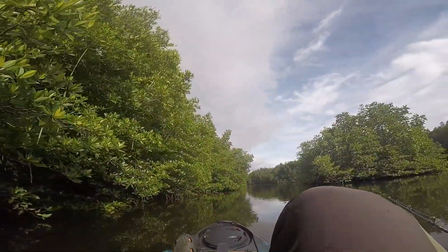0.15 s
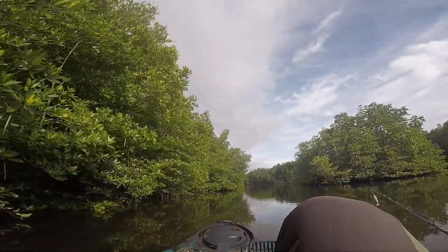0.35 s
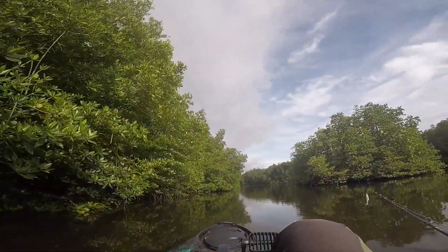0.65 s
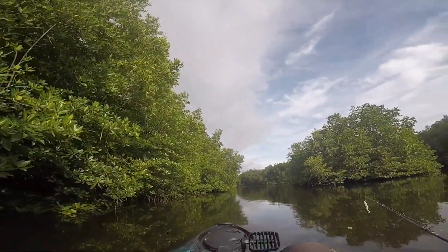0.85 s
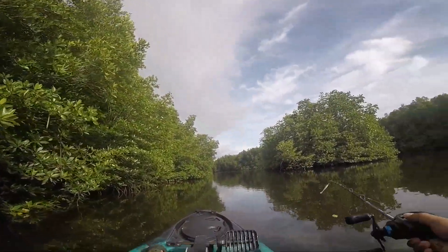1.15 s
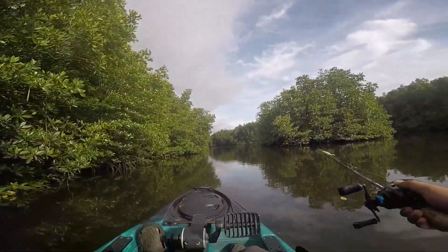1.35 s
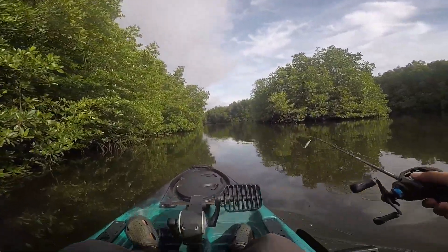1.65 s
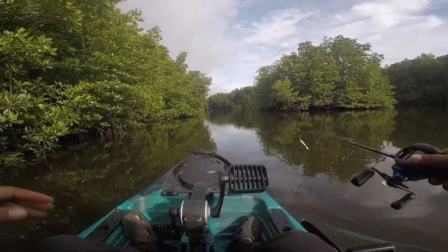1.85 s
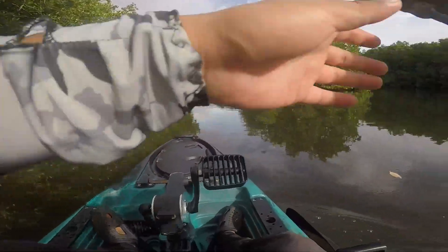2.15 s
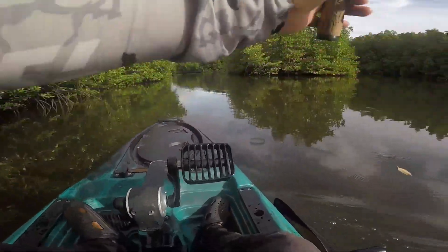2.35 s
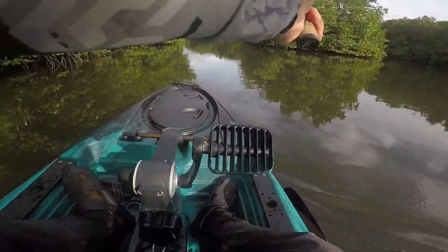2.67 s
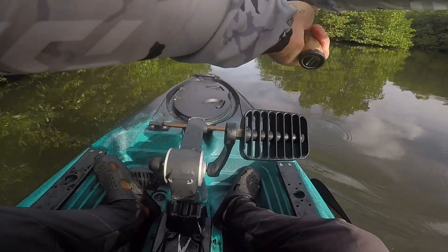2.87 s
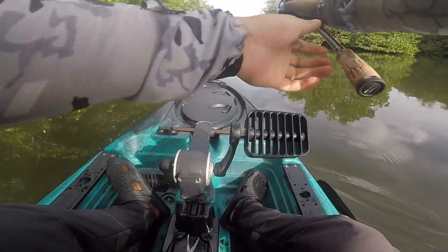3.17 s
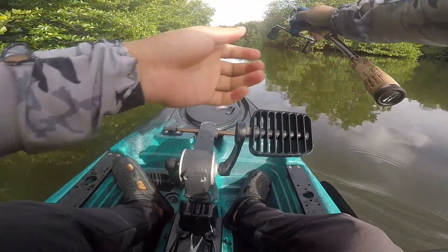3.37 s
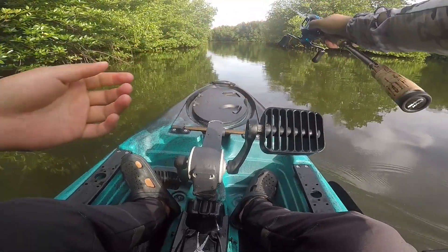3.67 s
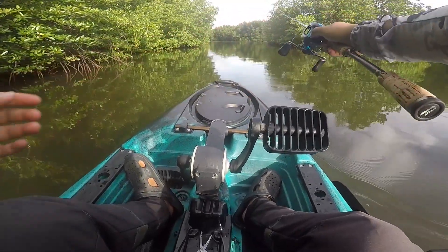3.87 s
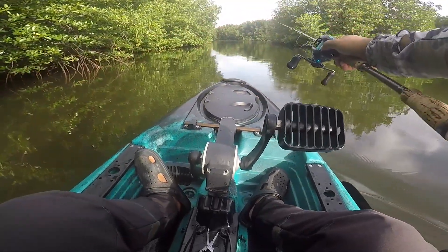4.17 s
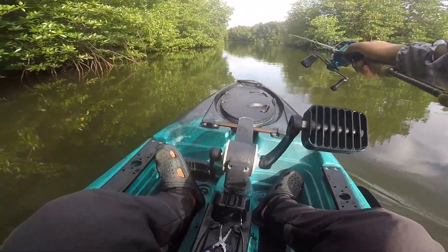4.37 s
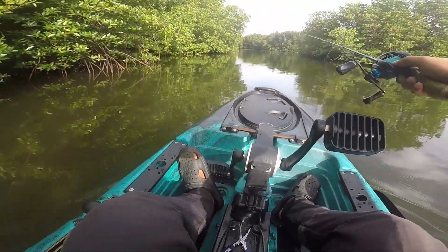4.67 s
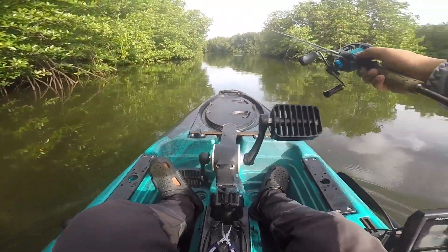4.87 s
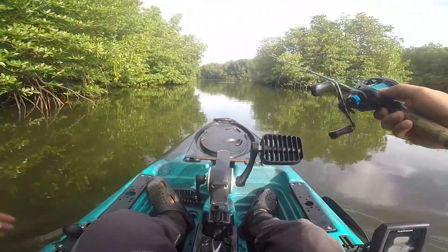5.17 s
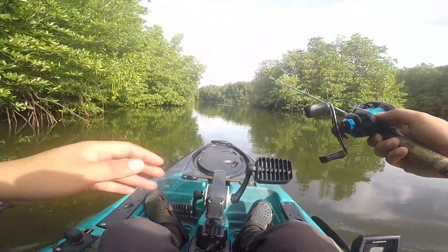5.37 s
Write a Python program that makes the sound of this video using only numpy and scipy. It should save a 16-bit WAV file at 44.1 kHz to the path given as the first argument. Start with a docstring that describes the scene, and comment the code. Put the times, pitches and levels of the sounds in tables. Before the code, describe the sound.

A cicada chirps in fast, shrill pulses over a distant insect chorus, with close sleeve rustles, soft knocks and a low rumble.

```python
"""Mangroves, from a drifting kayak. Off to the left a cicada buckles its tymbals and rings its abdomen,
five loud chirps a second, over distant cicadas and a faint hiss of air. The microphone is on an angler's
chest: with each arm movement a sleeve swishes and the shirt drags on its case, which is bumped, knocked
and ticks in its mount; the reel clicks once. About halfway through, the wind filter opens and lets in
the low rumble of boat and body."""
import sys
import numpy as np
from scipy import signal
from scipy.fft import rfft, irfft, next_fast_len
from scipy.io import wavfile
from scipy.ndimage import minimum_filter1d

SR = 44100
rng = np.random.default_rng(int(sys.argv[2]) if len(sys.argv) > 2 else 0)


def unload_audio(sound):
    """Save the sound as a 16-bit wav file, at the path given as the first command line argument."""
    columns = np.transpose(np.atleast_2d(sound))
    # keep every value between -1 and 1, then stretch to whole-number steps
    steps = np.round(np.clip(columns, -1, 1) * 32767)
    wavfile.write(sys.argv[1], SR, steps.astype(np.int16))


N = 243502
SIZE = 2 * next_fast_len(N // 2 + 1, real=True)  # working length in samples
TIME = np.arange(SIZE) / SR
HZ = np.fft.rfftfreq(SIZE, 1 / SR)

# The cicada's two tymbals. Each row: place in the cycle from 0 to 1, level in dB.
TYMBAL_STROKES = [(0, -20), (.435, -18.7)]
# Its resonant abdomen. Each row: frequency in Hz, gain in dB.
ABDOMEN = [(3500, -48.5), (4200, -40.5), (4900, -19.5), (5500, -9), (5900, -0.5), (6220, 3), (6650, -8.5),
           (7500, -12.5), (8100, -23), (8700, -26.5), (9800, -37.5), (11000, -27), (12000, -27.5),
           (12600, -30), (13200, -55), (14000, -84)]
# Its chirps. Each row: start in seconds, hold in seconds, level in dB, resonance shift in Hz.
CICADA_CHIRPS = [(-0.08, 0.09994, -25, 50), (0.11, 0.101, -23.5, 60.0), (0.302, 0.09006, -23.0, 40.0),
                 (0.492, 0.10497, -23, 50.0), (0.689, 0.11, -22.5, 50.0), (0.883, 0.099, -21, 60.0),
                 (1.069, 0.11, -20.5, -20.0), (1.263, 0.108, -20, 60.0), (1.462, 0.1002, -20.5, 30.0),
                 (1.649, 0.1, -19, -10.0), (1.848, 0.1082, -19, 10.0), (2.048, 0.0988, -19, 30.0),
                 (2.246, 0.1069, -19.5, 20.0), (2.441, 0.107, -19.3, 70.0), (2.641, 0.1129, -21.5, -60.0),
                 (2.828, 0.1107, -21, 20.0), (3.023, 0.104, -18.5, 110.0), (3.216, 0.0945, -21, 10.0),
                 (3.411, 0.095, -21, 110.0), (3.6, 0.098, -21, 80.0), (3.798, 0.0952, -19.5, 10.0),
                 (3.988, 0.098, -21.5, -10.0), (4.177, 0.093, -22, 40.0), (4.372, 0.0927, -20, 30.0),
                 (4.558, 0.09, -21.5, 29.5), (4.735, 0.0993, -22.5, 30.0), (4.927, 0.1, -22.5, -10.0),
                 (5.116, 0.099, -23, 0.0), (5.301, 0.0926, -22, 20.5), (5.483, 0.16, -24, 2)]
# Square chirps at first, rounder ones later. Each row: time in seconds, swell within a chirp in dB.
CHIRP_SWELL = [(2.4, -0.5), (3.0, 2.5), (5.5, 1.5)]
# Drifting past its tree. Each row: time in seconds, buzz between chirps in dB, left over right in dB.
DRIFT_PAST = [(0, -36, 14.5), (.7, -33.5, 16), (1.3, -31.5, 17), (2.2, -35, 18.5), (2.8, -37, 20),
              (3.1, -32, 20.5), (4.0, -29, 20), (5.5, -32, 19.5)]
# Crispest when the tree is nearest. Each row: time in seconds, scattered over direct sound in dB.
LEAF_SCATTER = [(0, 1), (1.4, -4), (2.5, -4), (3.3, -1), (5.5, 1)]
# The angler's body shades the microphone. Each row: frequency in Hz, share of the left-right difference.
BODY_SHADE = [(4000, -1.4), (5000, 0.4), (6000, 1), (6600, 0.29), (7500, 0.32), (8200, -0.5), (9500, -0.27),
              (12000, 0.37)]
# Spectra of the steady noises. Each row: frequency in Hz, relative level in dB.
FAR_CICADAS = [(3500, -47.0), (4800, -14), (5550, -5.0), (5900, 4.5), (6150, 0.0), (6550, -5.5),
               (7600, -14.5), (9500, -39.5)]
STILL_AIR = [(150, -6), (400, 5), (700, 13), (1700, -11), (2600, -1), (3500, -49), (6000, 4), (13000, 1.5)]
# Spectra of sleeve, shirt on the case, and rumble. Each row: frequency in Hz, relative level in dB.
SLEEVE_SPECTRUM = [(400, -1.5), (500, -9.5), (620, -4.5), (790, 2.5), (950, 1), (1090, 0), (1230, -1.5),
                   (1500, -3.5), (1800, -1.5), (2100, -14.5), (2450, -13), (2780, -17.5), (3000, -22),
                   (3450, -44), (3750, -21.5), (4050, -29), (4250, -42), (9000, -51)]
CASE_SPECTRUM = [(70, -24.5), (100, -9), (117, 5.5), (137, -4), (160, 5.5), (185, -1), (220, -2.5),
                 (290, -9.5), (390, -10), (480, -18.5), (800, -45.5)]
RUMBLE_SPECTRUM = [(12, 0), (28, -3.5), (45, 1), (70, 6), (100, -2), (150, -2.5), (220, -16), (400, -40)]
# Arm movements, close in. Each row: time of top speed in seconds, length in seconds,
# relative sleeve swish in dB, relative shirt drag in dB.
ARM_STROKES = [(0.18, 0.37, -68, -34.5), (0.975, 0.15, -43.5, -31.5), (1.045, 0.1, -44.5, -30.5),
               (1.242, 0.26, -48.5, -53), (1.443, 0.39, -49, -60), (1.788, 0.25, -44, -35.5),
               (1.929, 0.16, -39, -34), (2.133, 0.53, -37.5, -45), (2.34, 0.19, -34, -44),
               (2.467, 0.2, -31, -29), (2.577, 0.049, -31.5, -27), (2.611, 0.073, -29, -22),
               (2.66, 0.28, -42, -34), (2.993, 0.21, -52.5, -59), (3.569, 0.096, -48, -58),
               (4.266, 0.31, -51, -38), (4.563, 0.25, -45.5, -30), (4.683, 0.17, -37, -26),
               (4.745, 0.23, -45, -25), (4.929, 0.19, -37.5, -34), (5.183, 0.25, -46, -38),
               (5.367, 0.16, -43.5, -40), (5.482, 0.13, -41.5, -35)]
# The seated body never keeps quite still. Each row: time in seconds, relative level in dB.
BODY_STIR = [(0, -37.5), (.55, -38), (1.1, -35.5), (1.5, -38.5), (2.1, -29), (2.9, -39), (3.9, -40),
             (4.7, -38), (5.5, -41.5)]
# Rumble of the boat and the moving body. Each row: time in seconds, relative level in dB.
RUMBLE_LEVEL = [(2.42, -43), (2.59, -34), (2.9, -39.5), (3.25, -28.5), (3.6, -33), (3.85, -35.5),
                (4.25, -29.5), (5.0, -34.5), (5.5, -37.5)]
# The shirt sticks and slips on the case. Each row: start and end in seconds, level in dB, slips a second.
SHIRT_SHUDDERS = [(0, 0.18, -30.5, 164), (0.16, 0.383, -34.5, 164), (0.761, 0.854, -34.5, 192),
                  (1.76, 1.846, -30, 168), (4.657, 4.842, -22.5, 165), (4.924, 5.007, -25.5, 119)]
# Soft bumps on the case. Each row: time in seconds, relative peak in dB, contact time in milliseconds.
CASE_BUMPS = [(.194, -19, 2.6), (.488, -22, 2.6), (0.512, -18.5, 2.64), (0.973, -18, 1.2), (.984, -17, 1.8),
              (.999, -14, 0.71), (1.052, -14.5, 0.98), (1.062, -18, 2.3), (1.144, -15, 2.8),
              (1.199, -12, 2.45), (1.238, -16, 2.9), (1.427, -9, 2.3), (1.457, -12, 4.2), (1.521, -15, 2.8),
              (1.757, -7.5, 4.5), (1.78, -13.5, 3.5), (1.807, -17, 2.5), (1.88, -13, 2.8),
              (1.895, -9.5, 3.3), (1.998, -10, 2.35), (2.163, -8.5, 2.8), (2.374, -5.5, 2.7),
              (2.565, -16, 2.7), (2.587, -10.5, 1.96), (2.687, -12.5, 1.2), (4.308, -8.5, 2.04),
              (4.53, -9, .83), (4.619, -16.5, 2.1), (4.652, -7.5, 2.16), (4.693, -13.5, 1.9),
              (4.74, -14.5, 2.1), (4.905, -13, 2.9), (4.924, -12.5, 2.7), (5.357, -18, 0.92)]
# The case's modes. Each row: frequency in Hz, level in dB, seconds to die away by 60 dB.
CASE_MODES = [(114.2, -18.5, 0.22), (164.2, -14, 0.14), (208.6, 2, 0.037), (281.3, -9.5, 0.067),
              (374.6, -6.5, 0.054)]
# Ticks of mount and reel. Each row: start in seconds, peak in dB, centre in Hz, decay in seconds,
# width in octaves.
HARD_TICKS = [(0.249, -33.5, 1290, 0.012, 0.7), (.99, -17, 1380, 0.0013, 0.65),
              (1.052, -32, 1100, 0.0017, 0.66), (1.2, -34, 1500, 0.003, 1.3),
              (1.622, -29, 1360, 0.0054, 0.74), (1.7362, -23.5, 2940, .002, 0.2),
              (1.738, -14, 7000, 0.0012, .4), (1.738, -24, 1840, 0.0011, 0.5),
              (1.7395, -27, 3850, .0015, .2), (2.054, -22.5, 1550, .003, 0.65),
              (2.158, -22, 1480, .003, 0.69), (2.318, -18, 1300, 0.0037, .5),
              (2.344, -29, 1500, 0.0017, 0.93), (2.588, -5.5, 806, 0.0017, 1.32),
              (2.5899, -8, 1300, 0.0012, 1.1), (2.645, -18, 1670, 0.0021, 0.66),
              (2.669, -28, 3300, .003, 0.56), (2.674, -26, 2680, 0.0044, 0.28),
              (2.682, -23.5, 2870, .002, 0.24), (2.688, -9, 810, 0.0022, 1.3),
              (2.6895, -15, 1600, 0.0011, 1.3), (2.692, -29.5, 2200, 0.022, 1.3),
              (2.793, -24, 1510, 0.0066, 0.78), (4.229, -36, 2300, 0.011, 1.3),
              (4.308, -23, 696, 0.0046, 1.6), (5.209, -23.5, 1310, 0.0049, 0.69)]
# Forearm knocks. Each row: start in seconds, level in dB, swing in Hz, rise time in seconds.
FOREARM_KNOCKS = [(2.59, 0, 125, 0.002), (2.621, -11, 60, 0.0053), (2.689, -7.5, 105, 0.0027),
                  (2.715, -14, 84, 0.0051)]
# Slow jolts of the mount. Each row: start in seconds, peak in dB, time constant in seconds.
MOUNT_JOLTS = [(3.217, -10.5, 0.0062), (3.918, -16.5, 0.0078), (4.051, -16.5, 0.0063), (4.23, -18.5, 0.006)]
# Close sound at the two microphone ports. Each row: frequency in Hz, likeness from 0 to 1.
PORT_LIKENESS = [(30, 0.45), (130, 1), (250, 0.58), (380, 0.35), (520, 0.3), (750, 1), (1800, 1),
                 (2500, 0.6), (4000, 0.8), (6000, .1)]
# Their phase. Each row: frequency in Hz, left minus right in radians.
PORT_PHASE = [(300, 0), (520, -3), (750, -3), (1400, -2), (2400, -2), (3800, 0)]
# Their balance. Each row: frequency in Hz, left over right in dB.
PORT_BALANCE = [(30, -17.5), (70, 4), (200, 2.5), (360, 4), (660, 2.5), (2200, 0.5), (4000, 0.5)]


def amp(db):
    """Decibels to gain."""
    return 10 ** (np.asarray(db) / 20)


def unit(x):
    """Scales to rms 1."""
    return x / np.sqrt(np.mean(x ** 2) + 1e-20)


def read(points, hz=HZ):
    """Reads a spectrum table on a log-frequency axis."""
    table_hz, value = np.transpose(points)
    return np.interp(np.log(hz + 1), np.log(table_hz + 1), value)


def follow(rows):
    """A time curve at every sample."""
    return np.interp(TIME, *np.transpose(rows))


def add(mix, s, sound):
    """Mixes a sound in at s seconds."""
    part = mix[max(0, round(s * SR)):][:len(sound)]
    part += sound[:len(part)]


def colour(x, spectrum, size=2048):
    """Minimum-phase filter shaped by a spectrum table."""
    gain = amp(read(spectrum, np.fft.rfftfreq(size, 1 / SR)))
    cepstrum = irfft(np.log(gain))
    cepstrum[1:size // 2] *= 2
    cepstrum[size // 2 + 1:] = 0
    impulse = irfft(np.exp(rfft(cepstrum)))
    return signal.oaconvolve(x, impulse[None], axes=1)[:, :x.shape[1]]


def wander(rate_hz):
    """Slow random motion of rms 1."""
    knots = rng.standard_normal(2000)
    return unit(np.interp(2 * rate_hz * TIME, np.arange(len(knots)), knots))


def shifted(x, shift_hz):
    """Slides a whole spectrum up or down along a curve."""
    return (signal.hilbert(x) * np.exp(2j * np.pi * np.cumsum(shift_hz) / SR)).real


def tymbal_clicks(cycle_hz=116.96, jitter_s=.00005, rib_s=0.0003, snap_db=4.5, uneven_db=0.7):
    """Two tymbals buckle in turn, once a cycle each: a snap and a fast crackle of ribs."""
    cycles = np.cumsum(cycle_hz * (1 + .005 * wander(3))) / SR
    strokes = np.zeros(SIZE)
    for place, db in TYMBAL_STROKES:
        at = np.flatnonzero(np.diff(np.floor(cycles - place)))
        late, strength = rng.standard_normal((700, 2))[:len(at)].T
        at += np.round(late * jitter_s * SR).astype(int)
        strokes[np.clip(at, 0, SIZE - 1)] += amp(db + uneven_db * strength)
    t = np.arange(200) / SR
    ribs = signal.oaconvolve(strokes, t / rib_s * np.exp(-t / rib_s))[:SIZE]
    snap = np.array([strokes, -strokes])  # reaches the two ports in opposite phase
    return amp(snap_db) * unit(snap) + unit(ribs * rng.standard_normal((2, SIZE)))


def chirping(rise_s=0.014, fall_s=0.028):
    """Each chirp rises, holds and falls: its gate from 0 to 1, level in dB and resonance shift in Hz."""
    chirps = np.array(CICADA_CHIRPS)
    current = np.maximum(np.searchsorted(chirps[:, 0], TIME + rise_s / 2) - 1, 0)
    start, hold_s, db, shift_hz = chirps[current].T
    age_s = TIME - start
    gate = np.clip(np.minimum(.5 + age_s / rise_s, 1 - (age_s - hold_s) / fall_s), 0, 1)
    arch = np.sin(np.pi * np.clip(age_s / hold_s, 0, 1))
    return gate, db + follow(CHIRP_SWELL) * (arch - 3 / 4), shift_hz


def foliage(direct, t60=.07):
    """Leaves and trunks add a short diffuse tail that changes as the boat drifts."""
    t = np.arange(SR // 8) / SR
    tails = rng.standard_normal((2, 2, len(t))) * amp(-60 * t / t60) * (t > .001)
    a, b = (signal.oaconvolve(direct, tail / np.linalg.norm(tail[0]), axes=1)[:, :SIZE] for tail in tails)
    turn = 2 * np.pi * TIME
    scattered = a * np.cos(turn) + b * np.sin(turn)
    wet = amp(follow(LEAF_SCATTER))
    return (direct + wet * scattered) / np.hypot(1, wet)


def body_shadow(song, left_db):
    """The angler's body shades the right port, most strongly at the song's peak."""
    mean_db = np.mean(left_db)
    ratio = amp(mean_db * read(BODY_SHADE))
    gains = np.array([ratio, np.ones_like(ratio)]) * np.sqrt(2 / (1 + ratio ** 2))
    shaded = irfft(rfft(song) * gains)
    shaded[1] *= amp(mean_db - left_db)
    return shaded


def cicada(slack_hz=20, quiver_hz=30):
    """Off to the left, tymbals ring the abdomen: an unbroken buzz that steps up for each chirp."""
    when, *columns = np.transpose(DRIFT_PAST)
    buzz_db, left_db = (np.interp(TIME, when, column) for column in columns)
    gate, chirp_db, shift_hz = chirping()
    clicks = unit(tymbal_clicks())
    effort = amp(gate * chirp_db + (1 - gate) * buzz_db)
    voice = colour(clicks * effort, ABDOMEN) / np.std(colour(clicks, ABDOMEN))
    voice = shifted(voice, gate * shift_hz - (1 - gate) * slack_hz + quiver_hz * wander(18))
    return body_shadow(foliage(voice), left_db)


def chorus(level_db=-30.0, lean_db=4.0):
    """Distant cicadas blur into one smooth ring, louder on the left."""
    ring = colour(rng.standard_normal((2, SIZE)), FAR_CICADAS)
    return amp(level_db) * unit(ring) * amp([[lean_db], [-lean_db]])


def air(level_db=-46.5):
    """A faint hiss of still air."""
    return amp(level_db) * unit(colour(rng.standard_normal((2, SIZE)), STILL_AIR))


def friction(spectrum, grains_per_s, grain_db, patchy_db, patch_hz, size=8192):
    """Fine hiss and separate fibre snaps, gripping and slipping unevenly."""
    snaps = (rng.random(SIZE) < grains_per_s / SR) * rng.standard_normal(SIZE)
    drive = rng.standard_normal((2, SIZE)) + amp(grain_db) * unit(snaps)
    grip = amp(patchy_db * wander(patch_hz))
    return unit(colour(drive * grip, spectrum, size=size))


def arm_motion(rest_swish_db=-20.5, swish_sharpness=1.7, drag_sharpness=0.85):
    """Strength of swish and drag: each stroke speeds up and slows down, over a constant stirring."""
    stir_db = follow(BODY_STIR)
    sleeve_power, shirt_power = amp(stir_db + rest_swish_db) ** 2, amp(stir_db) ** 2
    for s, length_s, swish_db, drag_db in ARM_STROKES:
        speed = np.sin(np.linspace(0, np.pi, int(length_s * SR), endpoint=False))
        add(sleeve_power, s - length_s / 2, (amp(swish_db) * speed ** swish_sharpness) ** 2)
        add(shirt_power, s - length_s / 2, (amp(drag_db) * speed ** drag_sharpness) ** 2)
    return np.sqrt(sleeve_power), np.sqrt(shirt_power)


def clothing(swish_db=10.0, drag_db=0.5):
    """A sleeve swishes close by and the shirt drags right on the microphone's case."""
    swish = friction(SLEEVE_SPECTRUM, grains_per_s=900, grain_db=-6, patchy_db=1.7, patch_hz=60,
                     size=2048)
    drag = friction(CASE_SPECTRUM, grains_per_s=120, grain_db=-8.5, patchy_db=1.0, patch_hz=22.7)
    sleeve, shirt = arm_motion()
    return swish * sleeve * amp(swish_db) + drag * shirt * amp(drag_db)


def rumble(gain_db=1.5):
    """Slow motion of boat and body comes up through the mount."""
    noise = friction(RUMBLE_SPECTRUM, grains_per_s=58, grain_db=-17.0, patchy_db=3.5, patch_hz=9.4)
    return noise * amp(follow(RUMBLE_LEVEL) + gain_db)


def shudders(waver=0.082, overtone_db=-11.5, uneven_db=2.0):
    """The shirt's fast, uneven stick-slip locks onto the case's low ring."""
    phase_per_hz = 2 * np.pi * np.cumsum(1 + waver * wander(60)) / SR
    grip, out = amp(-uneven_db * wander(45)), np.zeros((2, SIZE))
    for start, end, db, slip_hz in SHIRT_SHUDDERS:
        part = slice(int(start * SR), int(end * SR))
        phase = slip_hz * phase_per_hz[part]
        tone = (np.sin(phase) + amp(overtone_db) * np.sin(2 * phase)) * grip[part]
        add(out[0], start, amp(db) * unit(tone * signal.windows.tukey(len(phase), .5)))
    return out


def bumps(gain_db=1.5, push_db=-18.0, push_s=0.0048, give_s=0.0019, lag_s=0.0022):
    """A soft contact rings the case's damped modes and shoves it."""
    t, out = np.arange(SR // 4) / SR, np.zeros((2, SIZE))
    for s, db, contact_ms in CASE_BUMPS:
        detunes = 1 + 0.062 * rng.standard_normal(len(CASE_MODES))
        ring = sum(amp(mode_db - 60 * t / t60) * np.sin(2 * np.pi * hz * detune * t)
                   for (hz, mode_db, t60), detune in zip(CASE_MODES, detunes))
        ring += amp(push_db) * (1 - t / push_s) * np.exp(-t / push_s)
        ring *= 1 - np.exp(-t / give_s)  # padded by cloth, the ring takes a cycle to build
        force = np.sin(np.pi * np.minimum(t * 1000 / contact_ms, 1))
        bump = signal.fftconvolve(ring, force)[:len(t)]
        add(out[0], s + lag_s, amp(db + gain_db) * bump / abs(bump).max())
    return out


def ticks(rise_share=0.086):
    """Hard plastic in mount and reel catches and lets go, ringing most strongly around one pitch."""
    t, out = np.arange(SR // 16) / SR, np.zeros((2, SIZE))
    hz = np.geomspace(100, 16000, 40)
    for s, db, centre_hz, decay_s, octaves in HARD_TICKS:
        band_db = -20 * np.log10(1 + 2 * (np.log2(hz / centre_hz) / octaves) ** 4)
        envelope = np.exp(-t / decay_s) * (1 - np.exp(-t / (rise_share * decay_s)))
        tick = colour(rng.standard_normal((2, len(t))) * envelope, np.transpose([hz, band_db]))
        for channel, sound in zip(out, tick):
            add(channel, s, amp(db) * sound / abs(sound).max())
    return out


def knocks():
    """The forearm knocks the case, which swings once or twice on its mount: a short, deep thud."""
    t, out = np.arange(SR // 8) / SR, np.zeros((2, SIZE))
    for s, db, swing_hz, rise_s in FOREARM_KNOCKS:
        envelope = t / rise_s * np.exp(1 - t / rise_s)
        add(out[0], s, -amp(db) * envelope * np.sin(2 * np.pi * swing_hz * t))
    return out


def jolts():
    """A slow jolt of the mount shoves the case without ringing its modes."""
    t, out = np.arange(SR // 4) / SR, np.zeros((2, SIZE))
    for s, db, jolt_s in MOUNT_JOLTS:
        phase = t / jolt_s
        shove = np.sin(phase) * np.exp(-phase / np.pi)
        add(out[0], s, -amp(db) * shove / shove.max())
    return out


def ports(shared, right_only):
    """Close sound reaches the two ports in phase in the bass and nearly opposed in the middle range."""
    likeness = read(PORT_LIKENESS)
    left = rfft(shared)
    right = likeness * left + np.sqrt(1 - likeness ** 2) * rfft(right_only)
    right *= np.exp(-1j * read(PORT_PHASE))
    lean = amp(read(PORT_BALANCE) / 2)
    return irfft(np.array([left * lean, right / lean]))


def scene():
    """The insects out in the trees and the angler's movements right at the microphone."""
    close = air() + clothing() + rumble() + shudders() + bumps() + ticks() + knocks() + jolts()
    return (cicada() + chorus() + ports(*close))[:, :N]


def record(dry, cut_hz=151.5, ceiling=0.62, hold_s=0.0567, top_hz=13250):
    """The chest microphone: a wind filter that opens midway, a limiter that holds, and a band limit."""
    wind_filter = signal.cheby1(5, 1, cut_hz, "highpass", fs=SR, output="sos")
    filtered = signal.sosfilt(wind_filter, dry)
    opened = follow([(2.2, 0.031), (2.46, 0.13), (2.58, 0.93)])[:N]  # seconds, share left unfiltered
    x = filtered + opened * (dry - filtered)
    hold = int(hold_s * SR)
    needed_gain = np.minimum(1, ceiling / (abs(x).max(0) + 1e-9))
    held_gain = minimum_filter1d(needed_gain, hold, origin=(hold - 1) // 2)
    smooth_gain = 1 + signal.lfilter([.01], [1, -.99], held_gain - 1)
    limited = np.clip(x * smooth_gain, -.9, .9)
    lowpass = signal.firwin(255, top_hz, window=("kaiser", 9), fs=SR)
    return signal.oaconvolve(limited, lowpass[None], "same")


dry = scene()
out = record(dry)
unload_audio(out)
```